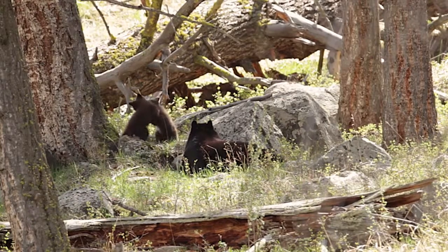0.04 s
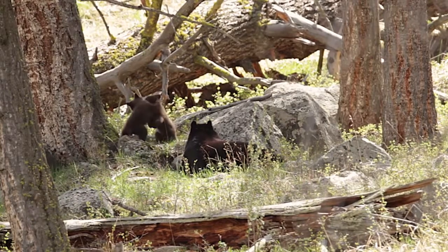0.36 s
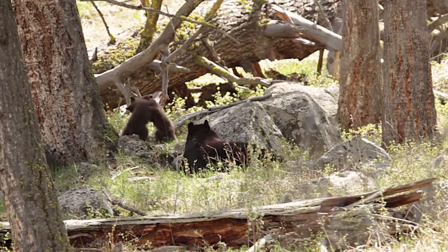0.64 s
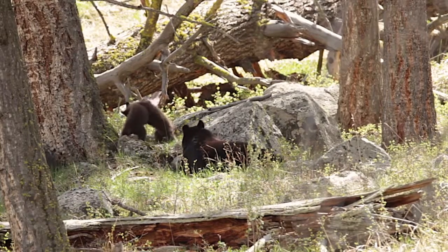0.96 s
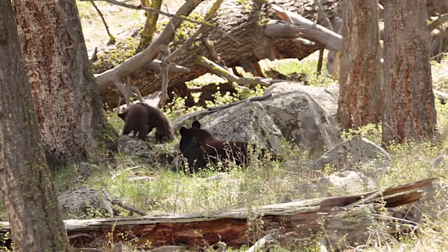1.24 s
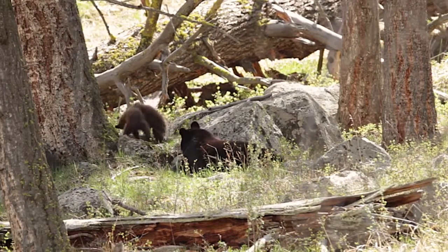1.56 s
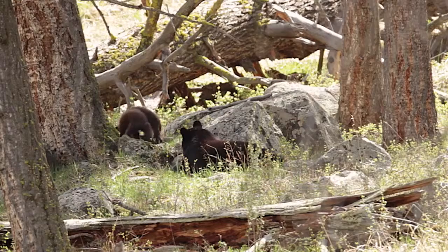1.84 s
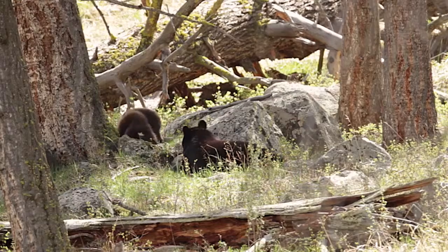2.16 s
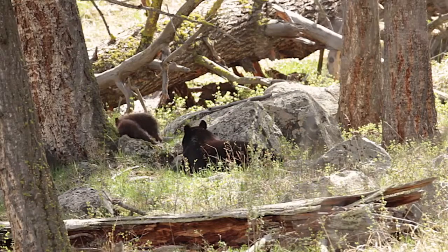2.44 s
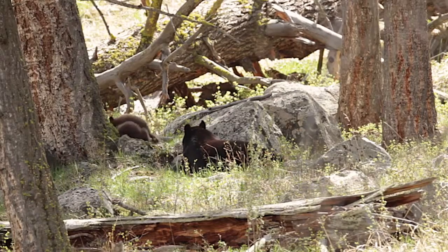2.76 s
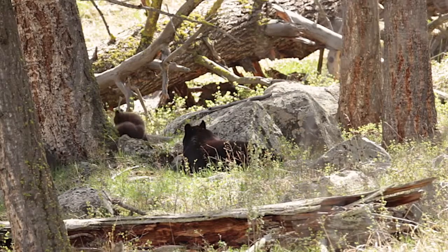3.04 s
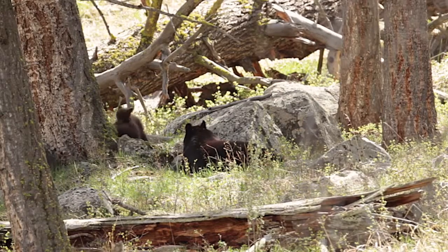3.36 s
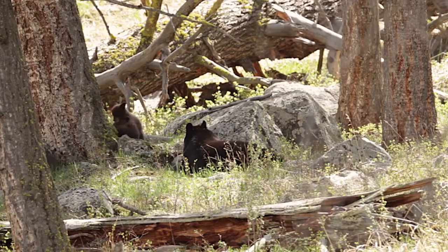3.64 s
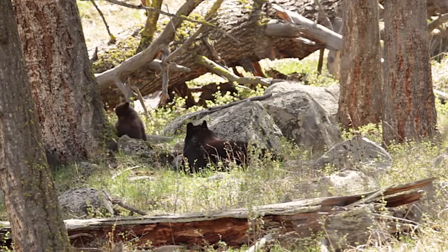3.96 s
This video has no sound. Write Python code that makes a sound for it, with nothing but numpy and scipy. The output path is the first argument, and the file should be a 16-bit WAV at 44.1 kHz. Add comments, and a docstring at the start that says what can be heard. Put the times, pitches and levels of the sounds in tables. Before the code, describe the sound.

Small birds sing softly in a forest, with a light echo. A warbled song runs from the start to about 2.7 seconds, joined by sharp chips around 0.4 to 1.2. Thin whistles and high chirps overlap, loudest around 1.5 to 2.5. A quick ticking trill follows from 3.1 to 3.9. A steady low rumble and a wavering drone like a far engine lie underneath throughout.

```python
"""Songbirds among tall trees

Several small birds sing at once: a low warbled song, thin whistles, hooked chips, buzzes and a run of
arched chirps that sinks into a ticking trill. Each note is a sine modulated in frequency and amplitude,
and the trunks scatter it into reverberation. Underneath lie a haze of far birds, a low outdoor rumble
and a wavering drone like a far engine."""
import sys
import numpy as np
from scipy import signal
from scipy.fft import rfft, irfft
from scipy.io import wavfile

SR = 44100
rng = np.random.default_rng(int(sys.argv[2]) if len(sys.argv) > 2 else 0)


def transcribe(signal):
    """Save signal, clipped to [-1, 1], as a 16-bit WAV file at the path in sys.argv[1]."""
    frames = np.atleast_2d(signal).T
    limited = np.clip(frames, -1, 1)
    pcm = np.round(limited * 32767).astype(np.int16)
    wavfile.write(sys.argv[1], SR, pcm)


N = 176400


def warble():
    """The low song: slow frequency modulation bends each note into a slur."""
    # song notes (start [s], length [s], level [dB], first [Hz], middle [Hz], last pitch [Hz])
    notes = [(0.003, 0.044, -69, 2745, 2540, 2450), (.045, .045, -69, 3050, 3100, 3050),
             (0.203, .075, -61.5, 2840, 2800, 2700), (.275, 0.05, -65.5, 2760, 3100, 3000),
             (0.366, 0.056, -64, 2456, 2520, 2300), (0.438, 0.063, -61.5, 3036, 3350, 2800),
             (0.556, 0.076, -60, 3120, 3330, 3030), (0.623, 0.05, -58.5, 3010, 3250, 3500),
             (0.848, 0.068, -56, 3560, 3500, 3120), (.853, 0.08, -64.5, 2726, 2680, 2680),
             (0.975, 0.042, -54, 3200, 2970, 2420), (1.035, 0.058, -57.5, 2755, 2780, 2500),
             (1.144, 0.036, -54, 3760, 3270, 3150), (1.668, 0.11, -50.5, 3750, 3330, 3850),
             (1.804, 0.031, -50.5, 3760, 3800, 3640), (1.889, .055, -51, 3303, 3750, 3750),
             (1.997, 0.038, -52.5, 3190, 3120, 3600), (2.029, 0.058, -54.5, 3390, 2860, 2830),
             (2.157, 0.046, -55, 2577, 3020, 2420), (2.265, .082, -65.5, 2250, 2340, 2480),
             (2.343, .038, -56, 2490, 2640, 2700), (2.42, 0.022, -56.5, 3650, 3270, 2650),
             (2.44, 0.039, -52, 2897, 3250, 3470), (2.477, 0.044, -53, 3620, 3340, 2980),
             (2.575, 0.045, -53, 3450, 3290, 3400), (2.619, 0.037, -54, 2900, 3210, 3300)]
    song = voice(slurs(notes), edge_s=0.0046, jitter=0.014, flutter_db=2)
    return forest(song, lead_ms=0.04, pan_db=-0.5, echo_db=-4, scatter_db=2, scatter_s=0.067)


def rasps():
    """Higher slurs: stronger random modulation widens the tone into a rasp."""
    # rasping notes (start [s], length [s], level [dB], first [Hz], middle [Hz], last pitch [Hz])
    notes = [(1.484, 0.098, -52.5, 5500, 4560, 5080), (1.639, 0.036, -58.5, 4510, 3850, 3250),
             (1.843, 0.035, -55, 4090, 3850, 3640)]
    song = voice(slurs(notes), edge_s=0.0053, jitter=0.021, flutter_db=3)
    return forest(song, lead_ms=0.058, pan_db=3, echo_db=-1, scatter_db=2, scatter_s=0.18)


def quavers():
    """Periodic frequency modulation, slow enough to be heard as a shake of pitch."""
    # quavering notes (start [s], length [s], level [dB], first [Hz], last [Hz], swing [Hz], rate [Hz])
    notes = [(1.173, 0.0755, -55.5, 2975, 3078, 200, 46), (1.294, 0.1, -57, 2893, 2720, 229, 25)]
    song = voice(vibrato(notes), edge_s=0.0066, jitter=0.013, flutter_db=2)
    return forest(song, lead_ms=0.026, pan_db=-1.5, echo_db=-4)


def whistles():
    """Nearly pure tones that swell, waver and sag; the highest scoop up to pitch."""
    # held notes (start [s], length [s], level [dB], pitch [Hz], left lead [ms])
    notes = [(0.941, 0.098, -56, 3880, 0.079), (1.254, 0.19, -53, 5435, -0.071),
             (1.341, 0.12, -54, 3857, -0.063), (1.51, 0.071, -52, 3825, 0.057),
             (1.686, 0.074, -48, 6967, 0.023), (1.966, 0.068, -49.5, 6904, 0.023),
             (2.068, 0.064, -52.5, 3786, 0.041), (2.159, 0.087, -57, 3780, 0.045),
             (2.883, 0.18, -68.5, 6020, 0.047)]
    scoop_hz, scoop_s, scoop_above_hz = 400, 0.0159, 6450
    sag_hz_per_s, swell_db = 320, 2
    waver_hz = 14 * drift(0.012)
    out = np.zeros((2, N))
    for start, length, db, hz, lead_ms in notes:
        t = clock(length)
        scoop = scoop_hz * (hz > scoop_above_hz) * np.exp(-(t / scoop_s) ** 2)
        pitch = hz - scoop - sag_hz_per_s * t + waver_hz[round(start * SR):][:len(t)]
        level = db + swell_db * (t / length - 0.5)
        note = voice([(start, pitch, level)], edge_s=0.031, jitter=0.0018, flutter_db=0.9)
        out += forest(note, lead_ms, pan_db=0, echo_db=-3)
    return out


def chips():
    """Fast frequency sweeps: high hooks plunge at the end, lower pips flick up and drop."""
    # hooked chips (start [s], level [dB], pitch [Hz])
    hooks = [(.452, -59.5, 6680), (.691, -59, 6580), (.866, -57.5, 6470), (1.006, -56, 6500),
             (1.151, -55, 6470)]
    # pips (start [s], level [dB])
    pips = [(.417, -58), (.657, -55.5), (.828, -53), (.97, -52.5), (1.113, -53)]
    # pitch contour of one pip (time [s], pitch [Hz])
    pip_contour = [(0, 4170), (.009, 4216), (.012, 4650), (0.018, 3130)]
    hook_s, hook_drop = 0.023, 0.183
    hook = 1 - hook_drop * (clock(hook_s) / hook_s) ** 4
    pip_hz = curve(pip_contour, clock(pip_contour[-1][0]))
    notes = [(start, hz * hook, db) for start, db, hz in hooks]
    notes += [(start, pip_hz, db) for start, db in pips]
    song = voice(notes, edge_s=0.007, jitter=0.0032, flutter_db=1)
    return forest(song, lead_ms=0.047, pan_db=-3, echo_db=-3.5)


def chirps():
    """Exponential sweeps join in arches, a faint rise and a stronger fall, among quick upward flicks."""
    # arched chirps (time of the top [s], level [dB], top pitch [Hz])
    arches = [(1.902, -68.5, 6980), (2.042, -62, 7350), (2.107, -64, 5880), (2.22, -65.5, 5570),
              (2.327, -58.5, 7380), (2.388, -59, 6840), (2.45, -59.5, 6040), (2.521, -58, 7360),
              (2.776, -60, 6600)]
    # upward flicks (start [s], level [dB])
    flicks = [(1.652, -71), (2.188, -66), (2.216, -63), (2.326, -61), (2.433, -66), (2.545, -64),
              (2.65, -63), (2.762, -63.5)]
    rise_s, fall_s, rounding_s, slope_per_s = 0.018, 0.022, 0.00516, 17
    flick_s, flick_top_hz = 0.0155, 7820
    t = clock(rise_s + fall_s) - rise_s
    arch = np.exp(-slope_per_s * (np.hypot(t, rounding_s) - rounding_s))
    rise_db = -8 * np.clip(0.5 - t / (2 * rounding_s), 0, 1)
    flick_hz = flick_top_hz * (0.88 + 0.12 * np.sqrt(clock(flick_s) / flick_s))
    notes = [(top - rise_s, hz * arch, db + rise_db) for top, db, hz in arches]
    notes += [(start, flick_hz, db) for start, db in flicks]
    song = voice(notes, edge_s=0.0052, jitter=0.014, flutter_db=3.5)
    return forest(song, lead_ms=0.028, pan_db=-3.5, echo_db=0.5)


def trill():
    """A slowing pulse train, loudest in the middle; each tick is an arched tone and a downward snap."""
    start, count, gap_s, slowing_s = 3.082, 11, 0.0725, 0.00033
    tick_s, snap_s = 0.0199, 0.011
    tick_hz = 4423 - 580 * (2 * clock(tick_s) / tick_s - 1) ** 2
    snap_hz = np.geomspace(7000, 2400, len(clock(snap_s)))
    notes = []
    for k in range(count):
        db = -55 - 3.5 * (2 * k / (count - 1) - 1) ** 2
        notes.append((start, tick_hz, db))
        notes.append((start, 2 * tick_hz, db - 21))  # second harmonic
        notes.append((start + tick_s / 2, snap_hz, db - 6))
        start += gap_s + slowing_s * k ** 2
    song = voice(notes, edge_s=0.0045, jitter=0.017, flutter_db=2)
    return forest(song, lead_ms=-0.088, pan_db=4.5, echo_db=-2.5)


def buzzes():
    """Distant notes whose rapid frequency modulation makes sidebands, heard as a buzz."""
    # buzzing glides (start [s], length [s], level [dB], first pitch [Hz], last pitch [Hz])
    glides = [(0.105, 0.048, -71, 4180, 4420), (0.166, .045, -79.5, 5100, 6270),
              (0.304, 0.047, -74, 4250, 4480), (.505, 0.048, -73, 4250, 4480), (.66, 0.08, -80, 7300, 7550),
              (0.716, 0.04, -69, 4900, 5600), (0.748, 0.04, -63, 5500, 5050),
              (1.45, 0.045, -60, 4500, 5700), (1.461, 0.039, -68, 7630, 7940),
              (2.878, .085, -77.5, 2950, 2300), (3.76, 0.16, -71.5, 3150, 2148),
              (3.817, 0.023, -72, 5200, 5700), (3.912, 0.026, -69, 5200, 5550)]
    depth, rate_hz = 0.056, 125
    notes = [(*glide, depth * glide[-1], rate_hz) for glide in glides]
    song = voice(vibrato(notes), edge_s=0.0062, jitter=0.025, flutter_db=3.5)
    return forest(song, lead_ms=0.027, pan_db=1, echo_db=6.5, scatter_db=8, scatter_s=0.11)


def far_chirps():
    """A far bird's steep downward sweeps: scatter from the trunks outweighs the direct sound."""
    # falling chirps (start [s], level [dB], top pitch [Hz])
    sweeps = [(2.588, -69.5, 5680), (2.664, -66, 5680), (2.73, -65, 5510), (2.787, -67, 5610),
              (2.81, -69, 5400), (2.884, -69, 5600), (2.959, -66, 5610), (3.041, -65.5, 5400),
              (3.108, -75, 4510), (3.244, -74, 4400), (3.5, -74, 4430), (3.625, -71.5, 4200)]
    length_s, fall_per_s = 0.026, 19
    fall = np.exp(-fall_per_s * clock(length_s))
    notes = [(start, hz * fall, db) for start, db, hz in sweeps]
    song = voice(notes, edge_s=0.0037, jitter=0.031, flutter_db=4)
    return forest(song, lead_ms=0.02, pan_db=0, echo_db=6.5, scatter_db=10, scatter_s=0.061)


def slurs(notes):
    """Pitch follows a parabola through each note's three frequencies."""
    for start, length, db, *pitches in notes:
        parabola = np.polyfit([0, 0.5, 1], pitches, 2)
        yield start, np.polyval(parabola, clock(length) / length), db


def vibrato(notes):
    """Sinusoidal frequency modulation about a linear glide."""
    for start, length, db, first, last, swing, rate in notes:
        t = clock(length)
        glide = first + (last - first) * t / length
        yield start, glide + swing * np.sin(2 * np.pi * rate * t), db


def voice(notes, edge_s, jitter, flutter_db):
    """A randomly modulated sine oscillator plays notes (start [s], pitch curve [Hz], level [dB])."""
    out = np.zeros(N + SR)
    waver, flutter = jitter * drift(0.0018), flutter_db * drift(0.003)
    for start, hz, db in notes:
        at = max(round(start * SR), 0) + np.arange(len(hz))
        to_edge = np.minimum(at - at[0], at[-1] - at)
        fade = np.sin(np.pi / 2 * np.minimum(to_edge / (edge_s * SR), 1))
        phase = 2 * np.pi * np.cumsum(hz * (1 + waver[at % N])) / SR
        out[at] += np.sqrt(2) * fade * amp(db + flutter[at % N]) * np.sin(phase)
    return out[:N]


def forest(song, lead_ms, pan_db, echo_db, scatter_db=-4, scatter_s=0.073):
    """Time and level differences place the direct sound; trunks add quick scatter and a long tail."""
    t60_s, first_echo_s = 1.06, 0.0051
    t = clock(1)
    reflections = rng.standard_normal((2, len(t))) * (rng.random((2, len(t))) < 0.05)
    decay = amp(-60 * t / t60_s) + amp(scatter_db - 60 * t / scatter_s)
    response = reflections * decay * (t > first_echo_s)
    response /= np.linalg.norm(response, axis=1, keepdims=True)
    echo = signal.fftconvolve(song[None], response, axes=1)[:, :N]
    lag = np.exp(-2j * np.pi * np.fft.rfftfreq(N, 1 / SR) * lead_ms / 1000)
    left = song * amp(pan_db / 2)
    right = irfft(rfft(song) * lag, N) * amp(-pan_db / 2)
    return np.array([left, right]) + amp(echo_db) * echo


def drone():
    """A low tone like a far engine; random amplitude and phase modulation make it waver."""
    # course of the drone (time [s], pitch [Hz], level [dB])
    course = [(0.0, 69.83, -45.5), (3.78, 81.88, -44.5), (3.95, 81.8, -50.5)]
    when, hz, db = np.transpose(course)
    depth, wobble_s, trim_db = 0.55, 0.062, 0.5
    t = np.arange(N) / SR
    wobble = 1 + depth * (drift(wobble_s) + 1j * drift(wobble_s))
    carrier = np.exp(2j * np.pi * np.cumsum(np.interp(t, when, hz)) / SR)
    return unit((wobble * carrier).real) * amp(trim_db + np.interp(t, when, db))


def haze():
    """Far birds add incoherently into a band of noise."""
    # spectrum of the haze (frequency [Hz], relative density [dB])
    spectrum = [(1800, -14.5), (2900, 4), (4400, -4.5), (5200, -6.5), (7400, -14.5), (9000, -27.5)]
    # loudness of the haze (time [s], level [dB])
    levels = [(0, -67.5), (1.5, -65.5), (2.3, -65.5), (2.8, -65.5), (3.3, -67.5), (4, -64)]
    return noise(spectrum) * amp(curve(levels, np.arange(N) / SR))


def air():
    """Outdoor rumble: steady broadband noise with most of its power in the bass."""
    # spectrum of the air (frequency [Hz], relative density [dB])
    spectrum = [(20, -18), (40, -8), (100, -11), (160, -16.5), (250, -23.5), (500, -34), (750, -31.5),
                (1200, -40), (2000, -48), (4200, -57), (6000, -66.5), (9500, -67.5), (15000, -74)]
    return amp(-44.5) * noise(spectrum)


def noise(spectrum):
    """A diffuse field: coloured noise, coherent between the ears only at long wavelengths."""
    # left-right likeness (frequency [Hz], correlation [-1 to 1])
    coherence = [(80, 0.98), (170, 0.94), (350, 0.8), (700, 0.19), (1400, -0.22), (12000, 0.12)]
    f = np.fft.rfftfreq(N, 1 / SR)
    correlation = np.clip(log_curve(coherence, f), -1, 1)
    mid, side = rfft(rng.standard_normal((2, N)))
    mid, side = mid * np.sqrt(1 + correlation), side * np.sqrt(1 - correlation)
    ears = np.array([mid + side, mid - side])
    return unit(irfft(ears * amp(log_curve(spectrum, f)), N))


def drift(span_s):
    """Low-passed noise of rms 1 that changes over about span_s."""
    f = np.fft.rfftfreq(N, 1 / SR)
    return unit(irfft(rfft(rng.standard_normal(N)) * np.exp(-(f * span_s) ** 2), N))


def curve(points, t):
    """Linear interpolation in time."""
    return np.interp(t, *np.transpose(points))


def log_curve(points, hz):
    """Interpolation on a log-frequency axis."""
    f, value = np.transpose(points)
    return np.interp(np.log(hz + 1), np.log(f + 1), value)


def clock(length):
    """Sample times over a length in seconds."""
    return np.arange(0, length, 1 / SR)


def amp(db):
    """Decibels to amplitude ratio."""
    return 10 ** (np.asarray(db) / 20)


def unit(x):
    """Normalisation to rms 1."""
    return x / np.sqrt(np.mean(abs(x) ** 2) + 1e-20)


def scene():
    """Superposition of the singers, each on its own perch, and the background."""
    birds = warble() + rasps() + quavers() + buzzes() + chips() + chirps() + far_chirps() + trill()
    return birds + whistles() + drone() + haze() + air()


def record(dry):
    """A linear-phase low-pass filter limits the bandwidth."""
    cutoff_hz = 15600
    lowpass = signal.firwin(511, cutoff_hz, window=("kaiser", 9), fs=SR)
    return signal.oaconvolve(dry, lowpass[None], "same")


dry = scene()
out = record(dry)
transcribe(out)
```